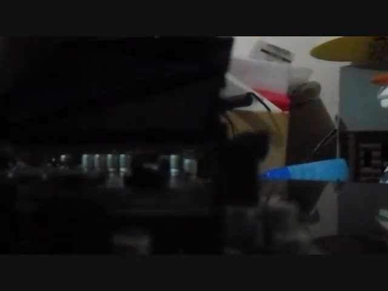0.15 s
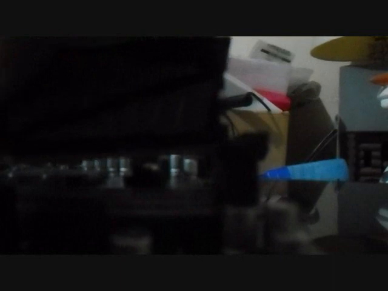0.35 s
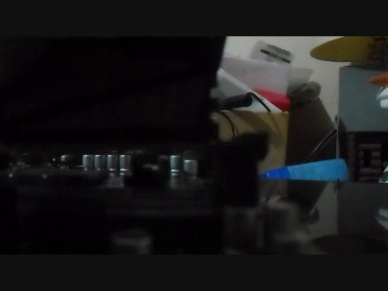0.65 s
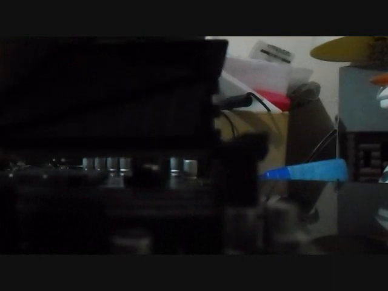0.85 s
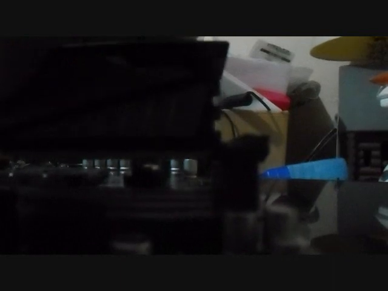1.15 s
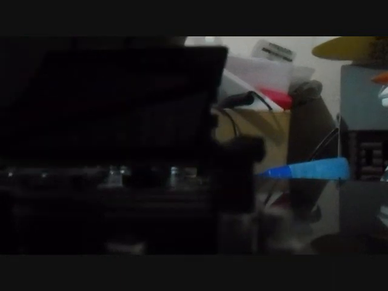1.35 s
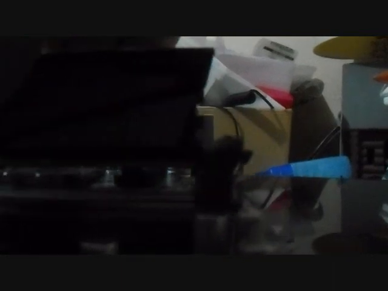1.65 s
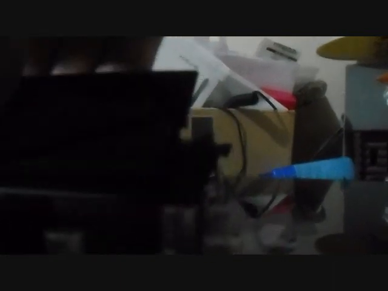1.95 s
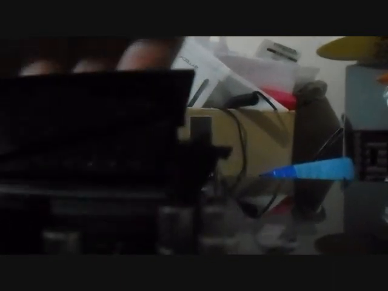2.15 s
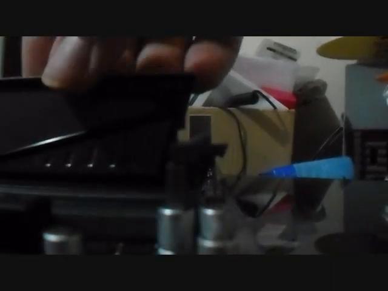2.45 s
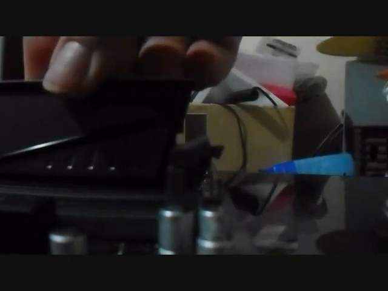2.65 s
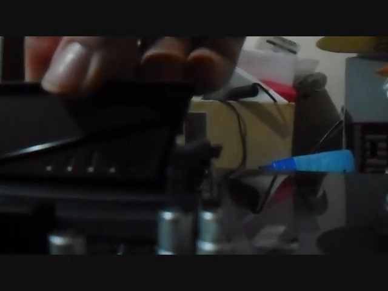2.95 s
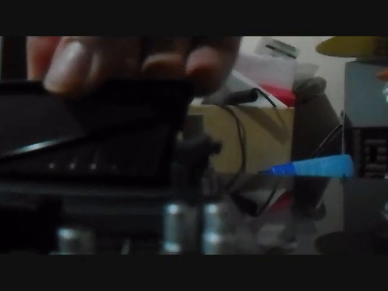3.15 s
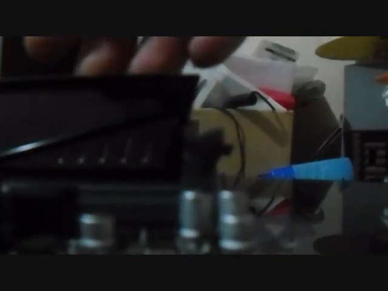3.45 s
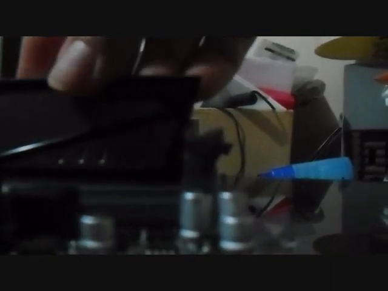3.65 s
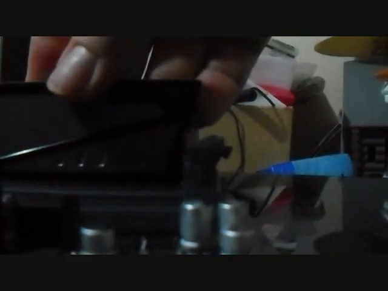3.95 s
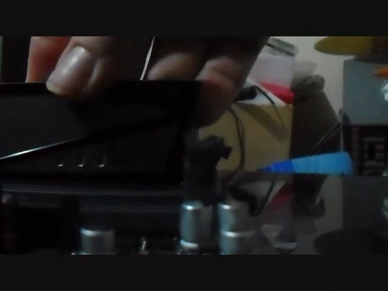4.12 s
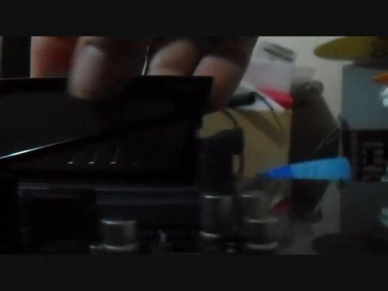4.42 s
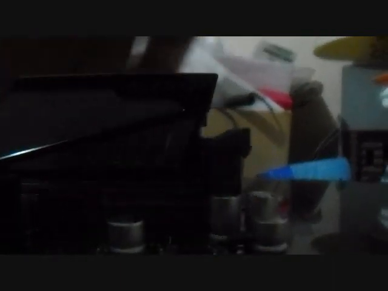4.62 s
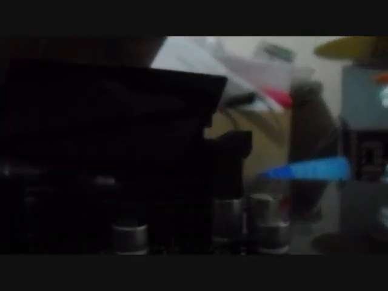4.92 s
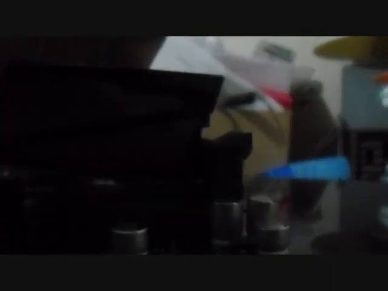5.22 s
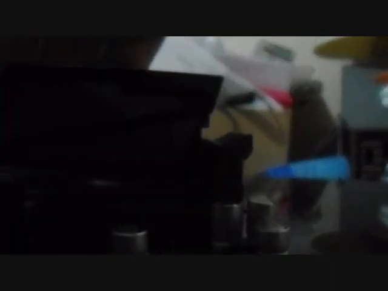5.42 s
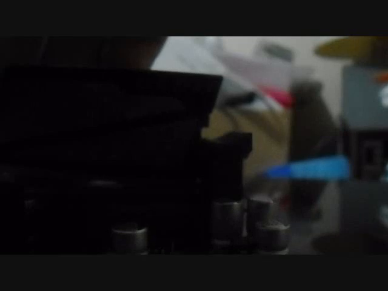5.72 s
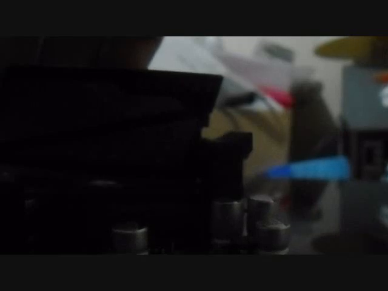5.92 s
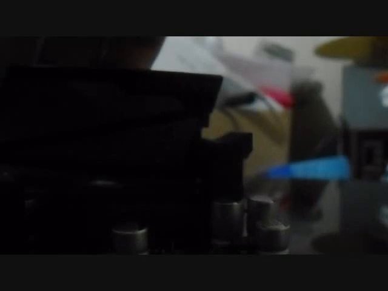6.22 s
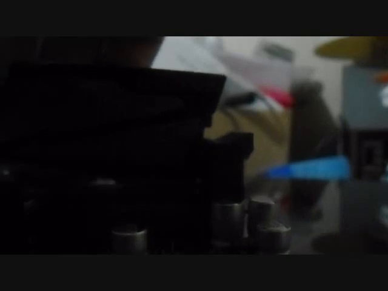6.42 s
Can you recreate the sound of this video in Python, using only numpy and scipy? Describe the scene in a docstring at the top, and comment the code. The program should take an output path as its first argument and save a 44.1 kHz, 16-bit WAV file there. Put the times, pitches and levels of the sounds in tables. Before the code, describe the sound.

Irregular close clicks, knocks and scrapes of computer parts handled on a table, one sharp crunching snap, over soft ticking and hiss.

```python
"""Indoors, at a table right in front of a small camera, hands shift a circuit board and a plug-in card.
Knocks ring the board, plastic edges click and scrape, parts judder and slide, and the table carries
low thumps to the microphone. Behind them the camera's focus drive ticks in bursts, once a frame, over
faint whines and hiss. The top end is dull, except where the loudest snap overloads the recorder."""
import sys
import numpy as np
from scipy import signal
from scipy.fft import rfft, irfft
from scipy.io import wavfile
from scipy.ndimage import uniform_filter1d

SR = 44100
rng = np.random.default_rng(int(sys.argv[2]) if len(sys.argv) > 2 else 0)


def waveform_to_disk(signal):
    """Save audio, clipped to [-1, 1], as 16-bit WAV at the path in sys.argv[1]."""
    frames = np.transpose(np.atleast_2d(signal))
    scaled = np.clip(frames, -1, 1) * 32767
    samples = np.round(scaled).astype(np.int16)
    wavfile.write(sys.argv[1], SR, samples)


N = 290178
TIME = np.arange(N) / SR

# Blows on the board: start_s, level_db, favoured_pitch_hz, lowest_mode_t60_s
BOARD_KNOCKS = [(.083, -37.5, 299.8, 0.068), (.155, -19.5, 586.6, 0.07882), (.259, -30, 401.7, 0.061),
                (.344, -20, 710.8, 0.06586), (.414, -36.5, 817, 0.0413), (.451, -29, 343.3, 0.0856),
                (.554, -35, 775, 0.1129), (.615, -37.5, 320, 0.0559), (.756, -5, 623.7, 0.08276),
                (.787, -25, 423.5, 0.04757), (.824, -16.5, 600.3, 0.13066), (.844, -25, 590, 0.08737),
                (.888, -23.5, 603, 0.0642), (.958, -22, 574.7, 0.11296), (.985, -20, 575, 0.0403),
                (1.006, -31, 397.5, 0.0621), (1.263, -27.5, 554, 0.04985), (1.327, -32, 475, 0.0662),
                (1.343, -29.5, 312.5, 0.0664), (1.37, -30.5, 447, .026), (1.401, -17, 220.7, .04),
                (1.408, -15, 330, .04), (1.415, -6.5, 633, 0.04108), (1.931, -3, 453, 0.04997),
                (1.945, -15, 308, 0.0193), (1.955, -1.5, 449.3, .045), (1.962, 4, 300.3, 0.01956),
                (1.971, -3, 239.4, 0.042), (1.987, 3.5, 645.6, .024), (1.992, -3, 400, .015),
                (1.996, 0.8517, 520, .015), (2.038, -14, 296, 0.02813), (2.228, -36.5, 333, 0.05964),
                (2.532, -26, 681.3, 0.06417), (2.631, -16, 339.9, 0.017226), (2.647, -34, 358, 0.0164),
                (2.808, -23, 480, 0.0279), (2.824, -29, 603, 0.0195), (2.836, -26, 619.9, 0.02645),
                (2.863, -27.5, 627.2, 0.02525), (2.892, -26, 632.6, 0.02268), (2.915, -33.5, 645, 0.04224),
                (2.947, -32, 626.8, 0.0303), (2.979, -27, 652, 0.03823), (3.005, -34, 633, 0.0316),
                (3.05, -34.5, 629.6, 0.03693), (3.095, -37.5, 642.2, .05), (3.216, -28, 635.9, 0.02552),
                (3.246, -34.5, 294, 0.0752), (3.286, -30, 611, 0.04737), (3.303, -32, 608, 0.0754),
                (3.333, -23, 791.9, 0.0577), (3.365, -34, 204.5, 0.063), (3.38, -30.5, 353, 0.06216),
                (3.785, -30.5, 441.7, 0.055), (3.799, -33, 475.5, 0.0459), (3.85, -23, 676.2, 0.02948),
                (3.874, -32.5, 425, 0.0501), (3.964, -40, 400, .05), (4.028, -32.5, 337, 0.05057),
                (4.049, -31.5, 352, 0.03433), (4.0785, -20, 541.2, .03), (4.173, -27, 624.9, 0.0295),
                (4.215, -27.5, 631, 0.04693), (4.24, -37, 540, 0.0537), (4.308, -41, 400, .05),
                (4.393, -31.5, 289.2, 0.0441), (4.411, -34.5, 215, 0.0403), (4.438, -29, 338.2, 0.02138),
                (4.623, -31.5, 313, 0.05237), (4.665, -37.5, 336, 0.0776), (4.85, -36, 700, 0.0291),
                (4.863, -16, 599.8, 0.03555), (4.884, -28, 464, 0.0655), (4.975, -30.5, 606.3, 0.0497),
                (5.38, -14.5, 400, .028), (5.601, -26, 502, 0.0293), (5.749, -32, 279.7, 0.0466),
                (6.445, -22, 404.5, 0.05358)]
# Resonances of the board, before finger damping: pitch_hz, gain_db, base_t60_s
BOARD_MODES = [(270.33, 0, 0.08045), (310.19, 0, .08), (375.45, -3, 0.045), (422.86, -5, .13),
               (474.95, -6, 0.055), (565.95, -4.5, 0.044), (629.39, -2, 0.083), (672.47, -3.5, .06),
               (799.04, -2.5, 0.082), (862.04, -5, 0.075), (928.81, -7, .09), (1058.1, -11, .07)]
# Edges and latches catching: start_s, peak_db, favoured_pitch_hz
EDGE_CLICKS = [(0.0796, -32.5, 4656), (0.154, -35.5, 2140), (0.1829, -39, 2290), (0.344, -27, 2110),
               (0.7551, -10, 2146), (.789, -36, 2170), (0.8256, -36, 2150), (.8886, -40, 2153),
               (0.9573, -38, 2140), (0.982, -20.5, 4793), (1.4023, -31.5, 2210), (1.414, -22, 2265),
               (1.424, -29.5, 2300), (1.93, -19.5, 2164), (1.957, -12, 2282), (1.962, -5, 2280),
               (1.967, -7.5, 3000), (1.9895, -5.5, 2349), (1.9953, -7.5, 1470), (2.039, -18, 1376),
               (2.225, -35.5, 2180), (2.5331, -24, 2552), (2.6287, -20.5, 1978), (2.809, -35.5, 1833),
               (2.8221, -38.5, 1917), (2.834, -36, 1846), (2.8638, -36, 1754), (2.8927, -38, 1830),
               (2.9197, -32, 2255), (2.9816, -37.5, 1870), (3.216, -31, 1841), (3.2451, -40, 1970),
               (3.334, -29.5, 2233), (3.3649, -34.5, 3554), (3.373, -34.5, 5090), (3.381, -36, 4530),
               (3.5154, -41, 1927), (3.7867, -36, 2280), (3.8515, -42, 1750), (3.8876, -36, 2814),
               (4.0795, -30, 1370), (4.133, -40, 2900), (4.1717, -31.5, 1938), (4.2158, -32.5, 1840),
               (4.3921, -31, 2400), (4.4082, -37.5, 2613), (4.549, -38.5, 5010), (4.622, -30, 2005),
               (4.669, -36, 2240), (4.8619, -30, 2022), (4.9739, -33, 3300), (5.001, -37.5, 2410),
               (5.3776, -29, 2135), (5.5993, -34.5, 2321), (5.7463, -39.5, 3280), (6.4463, -18, 2050),
               (6.4595, -35, 1860)]
# Resonances of the card, before damping: pitch_hz, gain_db, base_t60_s
CARD_MODES = [(1233.7, 0.5, 0.019), (1496.6, -5.5, .03), (1916.3, -5.5, 0.071), (2057.5, -5.5, 0.041),
              (2265.4, -2, 0.058), (2548.5, -4, 0.03), (2894.8, -7, 0.041), (3253.1, -4.5, 0.029),
              (3396.8, -7, 0.022), (3688.5, -4.5, 0.045), (3926.4, -5, 0.026), (4459, 0.5, 0.033),
              (4952.4, 1.5, 0.027)]
# Dry scrapes: start_s, end_s, centre_hz, rms_db
EDGE_SCRAPES = [(.09, 0.13, 4500, -70.5), (0.394, 0.47, 3280, -55.5), (0.537, 0.647, 4132, -53.5),
                (0.767, 0.863, 2800, -50), (0.865, 0.919, 3200, -54), (1.396, 1.431, 3327, -37.5),
                (0.976, 0.994, 4670, -38), (1.939, 1.956, 3800, -29.5), (1.953, 1.976, 2280, -10),
                (2.0, 2.088, 2800, -44), (2.486, 2.538, 3900, -46.5), (3.343, 3.399, 4200, -50),
                (3.72, 3.77, 4616, -56), (3.807, 3.901, 3200, -54.5), (4.393, 4.448, 3000, -58.5),
                (4.563, 4.643, 4200, -55.5), (4.841, 4.9, 3013, -53.5), (4.906, 5.02, 3800, -48.5),
                (6.451, 6.497, 2982, -51.5)]
# Slips of the board as it rocks on the table: start_s, peak_db
BOARD_SLIPS = [(1.445, -23.5), (1.466, -21), (1.496, -20), (1.516, -21), (1.539, -22), (1.557, -28),
               (1.578, -23.5), (1.592, -33.5), (1.612, -25), (1.623, -33), (1.644, -33), (2.109, -36.5),
               (2.14, -40), (3.419, -31), (3.429, -35), (3.46, -45), (4.902, -33), (4.916, -32.5),
               (4.929, -33)]
# Blows (fast rise) and presses (slow rise) on the table: peak_s, level_db, rise_s_per_20_db
TABLE_THUMPS = [(.05, -57, 0.8512), (.77, -45.5, 0.0048), (1.01, -47, 0.1012), (1.34, -49, 0.2064),
                (1.41, -36, 0.083), (1.69, -42.5, .3), (1.97, -21, 0.0471), (1.99, -27, 0.0486),
                (2.12, -44, .06), (2.5, -52.5, 0.1833), (2.66, -47, 0.2195), (3.39, -37, 0.1292),
                (3.48, -47, 0.2182), (3.87, -44, 0.1742), (4.07, -45.5, 0.1919), (4.14, -49.5, 0.1355),
                (4.45, -49.5, 0.4234), (4.71, -48, 0.2233), (4.88, -35, 0.0494), (5.39, -46.5, 0.1453),
                (5.64, -50, 0.1389), (6.1, -56, 0.5154), (6.45, -41.5, 0.0663)]
# Sliding strokes: start_s, end_s, drag_db, squeak_db
SLIDE_STROKES = [(0, 0.332, -61.5, -66), (0.324, 0.801, -56, -55.5), (.88, 1.004, -52.5, -72),
                 (1.46, 1.667, -46.5, -82), (1.682, 1.797, -60, -64.5), (2.08, 2.55, -59.5, -57),
                 (2.58, 3.498, -60, -68), (3.501, 4.305, -61, -67.5), (4.292, 4.75, -57, -75),
                 (4.75, 5.051, -61, -65), (6.2, 6.598, -66, -68)]
# Runs of the focus drive; the barrel's pitch follows the lens position:
# start_s, end_s, delay_in_frame_ms, peak_db, barrel_pitch_hz, rattle_gain_db
FOCUS_RUNS = [(0, .12, 14.81, -37, 993.6, -11), (.35, .75, 12.464, -45, 1173, -9.5),
              (1.68, 1.95, 14.007, -36, 937.1, -4.5), (2.05, 2.65, 15.5, -42.5, 1047, -2.5),
              (2.68, 3.48, 14.967, -43.5, 1173, -8.5), (3.48, 4.18, 14.755, -42, 1243, -6.5),
              (4.18, 4.55, 15.8, -41, 1250, -8), (4.55, 4.98, 15.73, -43, 1247, -4),
              (5.78, 6.185, 17.755, -35, 962.5, 0.4958), (6.215, 6.415, 18.19, -35, 1002, 3),
              (6.52, 6.55, 19, -38, 930, -6)]
# Resonances of the lens barrel: barrel_pitch_ratio, gain_db, t60_s
BARREL_MODES = [(.9, -0.5, 0.043), (1.08, 2.5, .022)]
# Resonances of the lens: pitch_hz, gain_db, t60_s
LENS_MODES = [(1718.7, -7.5, .012), (2062.3, -4, 0.028), (2550, -11.5, 0.0058), (3022.5, -7.5, .012),
              (3571.9, -6.5, 0.0064), (3900, -12.5, 0.0064), (4696.4, -3, .007), (4776.2, 0.5, 0.0097),
              (5050.3, -2.5, 0.008)]
# Faint thin tones: start_s, end_s, pitch_hz, rms_db
WHINE_TONES = [(1.051, 1.3, 918.2, -69.5), (3.4, 3.988, 808.3, -65.5), (4.403, 4.82, 778.1, -64),
               (5.002, 5.809, 763.9, -72.5), (5.02, 5.449, 1530, -72), (5.17, 5.38, 2022, -68.5)]
# Tone curve of the noise floor: frequency_hz, relative_db
HISS_CURVE = [(20, -4.5), (60, -14.5), (130, -14.5), (300, -21.5), (800, -37), (2000, -27.5), (5000, -32)]


def undb(db):
    return 10 ** (np.asarray(db) / 20)


def unit(x):
    return x / np.sqrt(np.mean(x ** 2))


def band(x, lo_hz, hi_hz, order=2):
    return signal.sosfilt(signal.butter(order, [lo_hz, hi_hz], "band", fs=SR, output="sos"), x)


def walk(rate):
    """Random levels held 1 / rate s and slewed twice; spread near 1."""
    k = int(SR / rate)
    return 1.3 * uniform_filter1d(uniform_filter1d(np.repeat(rng.standard_normal(N // k + 1), k), k), k)[:N]


def strike(out, modes, start_s, peak_db, contact_ms, scatter_db,
           favour_hz=2000, width_octaves=np.inf, t60_scale=1):
    """Mix in one hit: modes swell during contact, then ring; a finite width favours those near a pitch."""
    hz, db, t60 = np.transpose(modes)
    level_draw, pitch_draw = rng.standard_normal((2, len(hz)))
    gain = undb(db + scatter_db * level_draw - 6 * (np.log2(hz / favour_hz) / width_octaves) ** 2)
    detuned_hz = hz * (1 + .015 * pitch_draw)
    length_s = min(.012 + max(t60) * t60_scale, .11)
    t = TIME[:int(SR * length_s), None]
    contact_s = contact_ms / 1000
    swell = np.sin(np.pi / 2 * np.minimum(t / contact_s, 1)) ** 2
    decay = np.exp(-np.log(1000) * np.maximum(t - contact_s, 0) / (t60 * t60_scale))
    ring = np.sin(2 * np.pi * (detuned_hz * t + rng.random(len(hz)))) * swell * decay
    # the surfaces chatter while they touch, roughening the attack
    grit = uniform_filter1d(rng.standard_normal(SR // 8), size=12)[:len(t)]
    chatter = 1 + 1.568 * grit * np.exp(-t[:, 0] / (3.2 * contact_s))
    hit = ring @ gain * chatter
    start = int(start_s * SR)
    out[start:start + len(hit)] += (undb(peak_db) * hit / np.abs(hit).max())[:len(out) - start]


def board_knocks():
    """Hollow knocks: fingers damp the board, so each blow rings for its own time."""
    out = np.zeros(N)
    for start_s, db, hz, t60_s in BOARD_KNOCKS:
        strike(out, BOARD_MODES, start_s, db, contact_ms=3, scatter_db=2.5,
               favour_hz=hz, width_octaves=.75, t60_scale=t60_s / BOARD_MODES[0][2])
    return band(out, 130, 2500)


def card_clicks():
    """Hard plastic edges catch and let go with a short, bright crunch."""
    out = np.zeros(N)
    for start_s, db, hz in EDGE_CLICKS:
        strike(out, CARD_MODES, start_s, db, contact_ms=2.1, scatter_db=2,
               favour_hz=hz, width_octaves=.8, t60_scale=.55)
    return out


def edge_scrapes():
    """Edges rasp past each other: gritty noise around a broad resonance."""
    out = np.zeros(N)
    grit = rng.standard_normal(N) * undb(4 * walk(180) + 3.7 * walk(900))
    for start_s, end_s, hz, db in EDGE_SCRAPES:
        span = slice(int(start_s * SR), int(end_s * SR))
        rasp = unit(band(grit[span], hz / 1.8, hz * 1.4915, order=1))
        out[span] += undb(db) * rasp * signal.windows.tukey(len(rasp), .4)
    return out


def board_judder():
    """Each slip is a short flat push that rings the board; it tips to and fro, so the sign alternates."""
    out = np.zeros(N)
    t = TIME[:900]
    push_s, ring_hz = .002, 816.52
    rebound = .774 * (t >= push_s) * np.exp(-(t - push_s) / .0015)
    push = (t < push_s) - rebound
    ring = .996 * np.exp(-t / .002762) * np.cos(2 * np.pi * ring_hz * t)
    jolt = uniform_filter1d(np.pad(push + ring, (8, 0)), size=12)  # rounds off the corners
    for k, (start_s, db) in enumerate(BOARD_SLIPS):
        start = int(start_s * SR)
        out[start:start + len(jolt)] -= (-1) ** k * undb(db) * jolt / jolt.max()
    return out


def table_thumps():
    """The low end: the table top heaves under the camera, over a faint steady rumble."""
    rumble_db, fall_db_per_s = -64.5, 190
    heave = undb(rumble_db)
    for peak_s, db, rise_s in TABLE_THUMPS:
        since_peak = TIME - peak_s
        envelope_db = np.minimum(20 * since_peak / rise_s, -fall_db_per_s * since_peak)
        heave = np.hypot(heave, undb(db + envelope_db))
    return unit(band(rng.standard_normal(N), 22, 95)) * heave


def sliding_parts():
    """Dense stick-slip grains: a dull drag in the board and a narrow, squeaky resonance."""
    fade_s = .052
    drag, squeak = undb(-64), undb(-73)  # resting hands never lie quite still
    for start_s, end_s, drag_db, squeak_db in SLIDE_STROKES:
        fade = np.clip(np.minimum(TIME - start_s, end_s - TIME) / fade_s + .5, 0, 1)
        drag = np.hypot(drag, undb(drag_db) * fade)
        squeak = np.hypot(squeak, undb(squeak_db) * fade)
    drag_grains = rng.standard_normal(N) * undb(3 * walk(60))
    squeak_grains = rng.standard_normal(N) * undb(3 * walk(40))
    return unit(band(drag_grains, 200, 770)) * drag + unit(band(squeak_grains, 1120, 1500)) * squeak


def focus_ticks():
    """While the drive runs, one motor step in each frame shakes the barrel and rattles the lens."""
    out = np.zeros(N)
    frames_per_s, rattle_above_hz = 30, 3500
    frames = np.arange(0, N / SR, 1 / frames_per_s)
    jitter = rng.standard_normal((len(frames), 2)) * (.3, 1.8)  # timing_ms, level_db
    for start_s, end_s, delay_ms, db, barrel_hz, rattle_db in FOCUS_RUNS:
        modes = np.vstack([np.multiply(BARREL_MODES, (barrel_hz, 1, 1)), LENS_MODES])
        modes[modes[:, 0] > rattle_above_hz, 1] += rattle_db
        running = (frames >= start_s) & (frames < end_s)
        for frame_s, (jitter_ms, jitter_db) in zip(frames[running], jitter[running]):
            tick_s = frame_s + (delay_ms + jitter_ms) / 1000
            strike(out, modes, tick_s, db + jitter_db, contact_ms=2.4, scatter_db=1.5)
    return out


def whines():
    """Thin tones come and go, wavering in level and pitch."""
    out = np.zeros(N)
    fade_s = .026
    for start_s, end_s, hz, db in WHINE_TONES:
        fade = np.clip(np.minimum(TIME - start_s, end_s - TIME) / fade_s, 0, 1)
        waver_db, waver_rad = 2.5 * walk(15), .6 * walk(12)
        out += np.sqrt(2) * undb(db + waver_db) * fade * np.sin(2 * np.pi * hz * TIME + waver_rad)
    return out


def room_reflections(sound, t60_s=.14, build_s=.0047, level_db=-22):
    """A tight room: reflections build up over some milliseconds and die away."""
    t = TIME[:SR // 2]
    tail = band(rng.standard_normal(len(t)), 150, 3500, order=1)
    tail *= np.exp(-np.log(1000) * t / t60_s) * (1 - np.exp(-t / build_s))
    return undb(level_db) * signal.fftconvolve(sound, tail / np.sqrt(np.sum(tail ** 2)))[:N]


def hiss(rms_db=-56.5):
    """A steady bed of microphone and room noise, bass-heavy with scooped mids."""
    hz = np.fft.rfftfreq(N, 1 / SR) + 1
    curve_hz, curve_db = np.transpose(HISS_CURVE)
    shape = undb(np.interp(np.log(hz), np.log(curve_hz), curve_db)) * (hz > 20)
    return unit(irfft(rfft(rng.standard_normal(N)) * shape, N)) * undb(rms_db)


def scene():
    """The mono mix: knocks, clicks and scrapes feed the room; all else stays dry."""
    handling = board_knocks() + card_clicks() + edge_scrapes()
    foreground = handling + room_reflections(handling) + board_judder()
    return (foreground + focus_ticks() + sliding_parts() + table_thumps() + whines() + hiss())[None]


def record(dry):
    """A narrow-band converter dulls the top; overload after it splashes treble above its band."""
    converter_top_hz, output_top_hz = 5324, 15800
    converter_lowpass = signal.ellip(10, .2, 80, converter_top_hz, fs=SR, output="sos")
    output_lowpass = signal.ellip(8, .2, 70, output_top_hz, fs=SR, output="sos")
    overloaded = np.clip(signal.sosfilt(converter_lowpass, dry), -1, 1)
    return signal.sosfilt(output_lowpass, overloaded)


dry = scene()
out = record(dry)
waveform_to_disk(out)
```